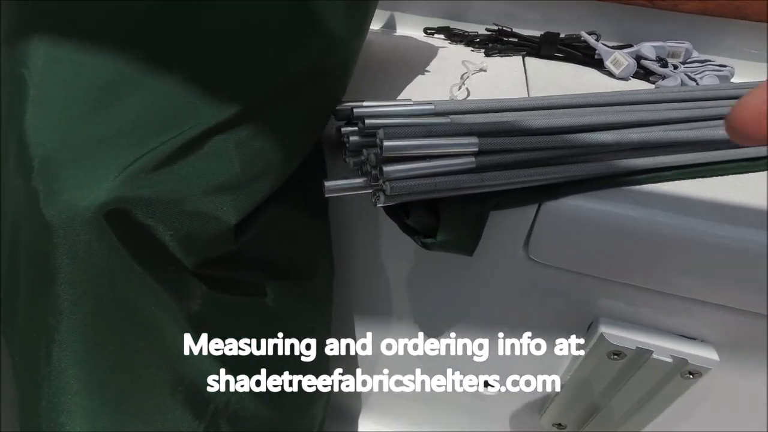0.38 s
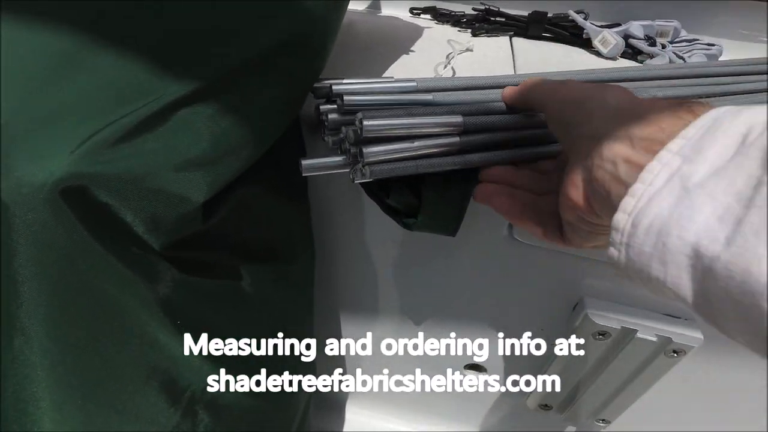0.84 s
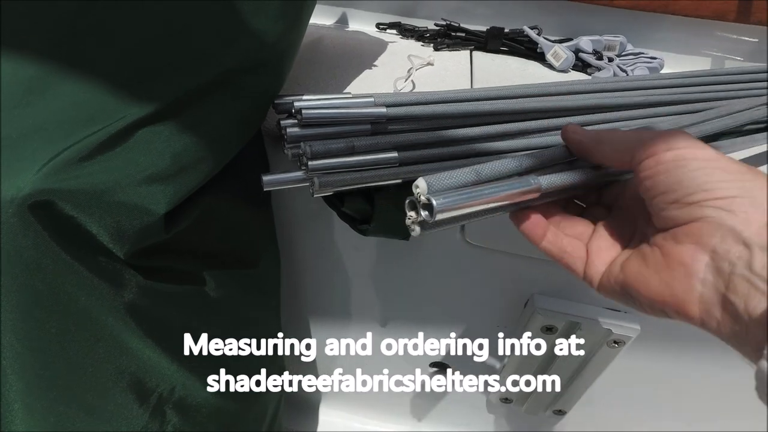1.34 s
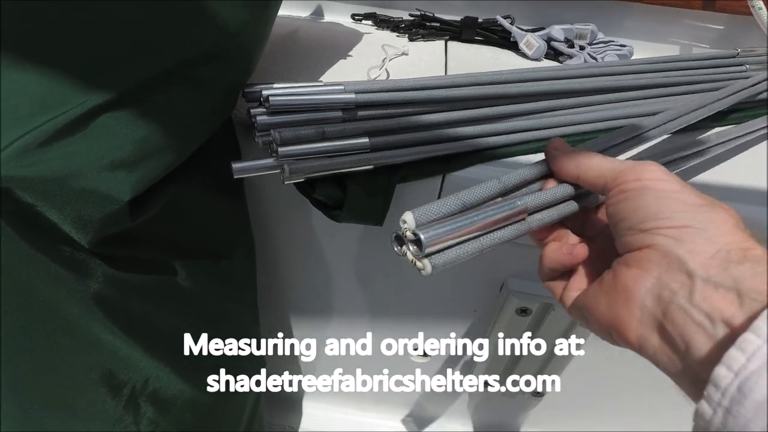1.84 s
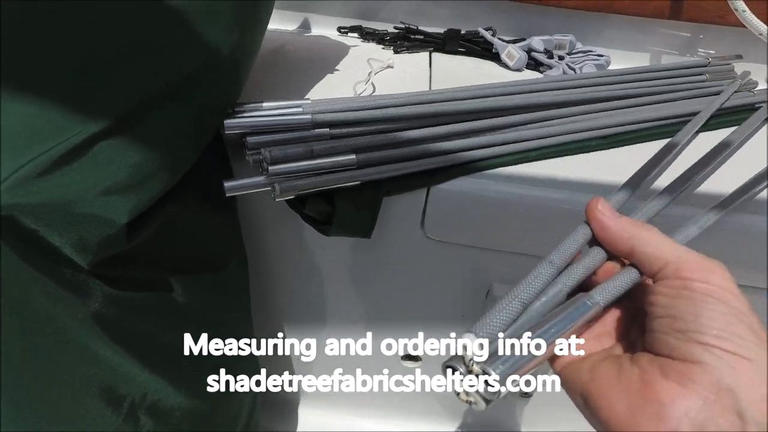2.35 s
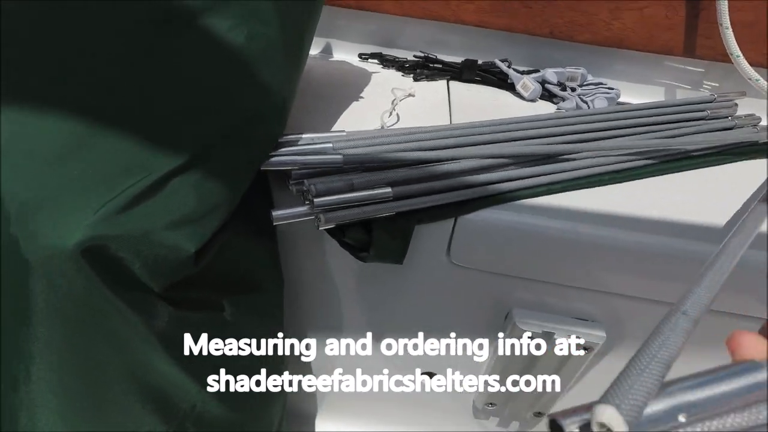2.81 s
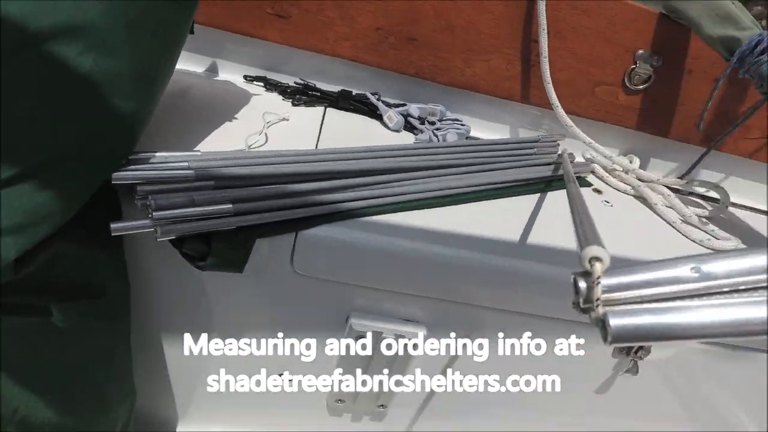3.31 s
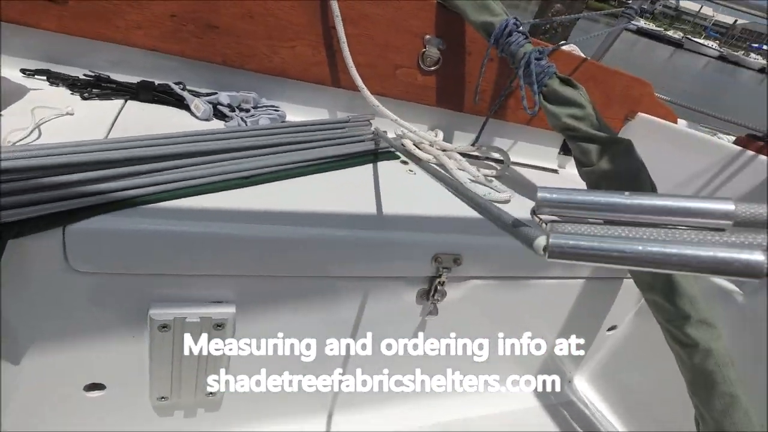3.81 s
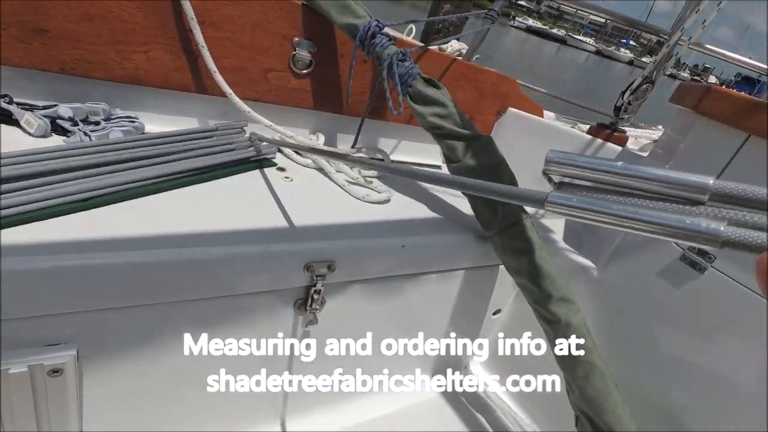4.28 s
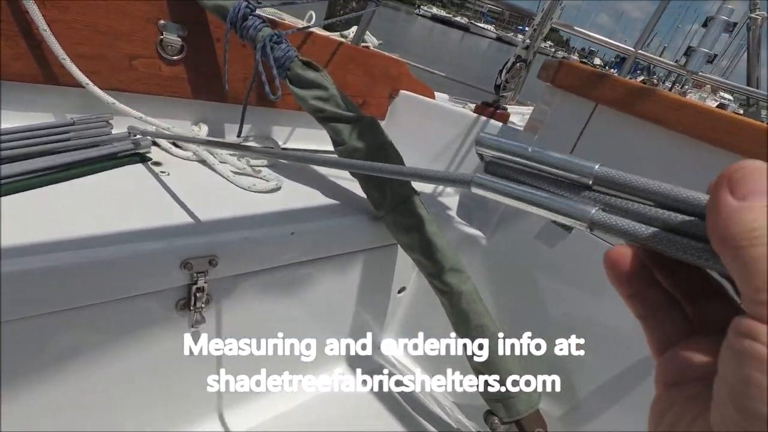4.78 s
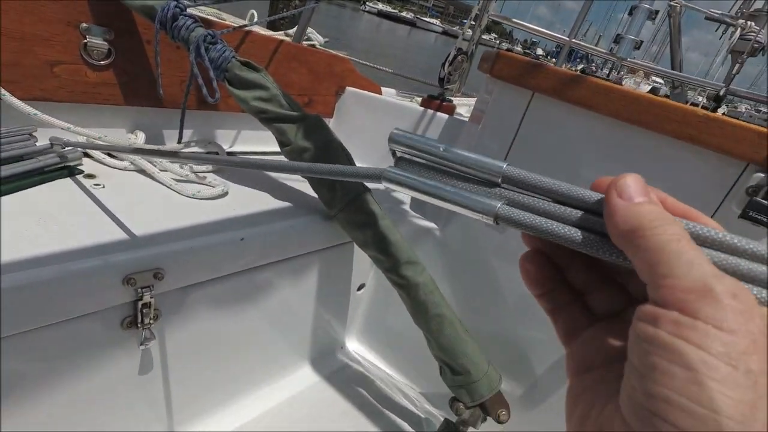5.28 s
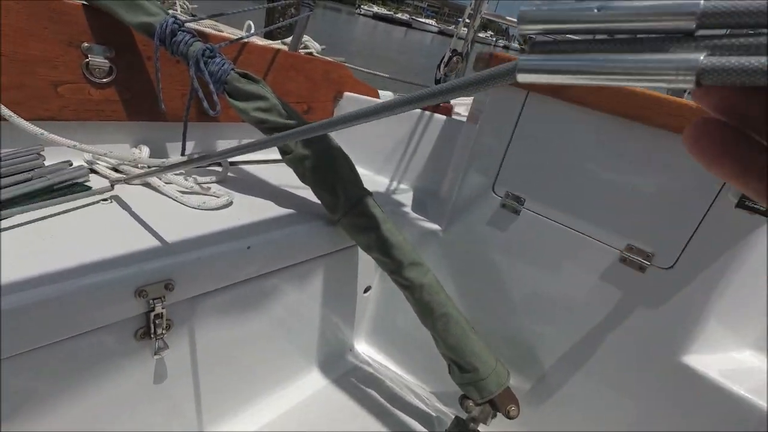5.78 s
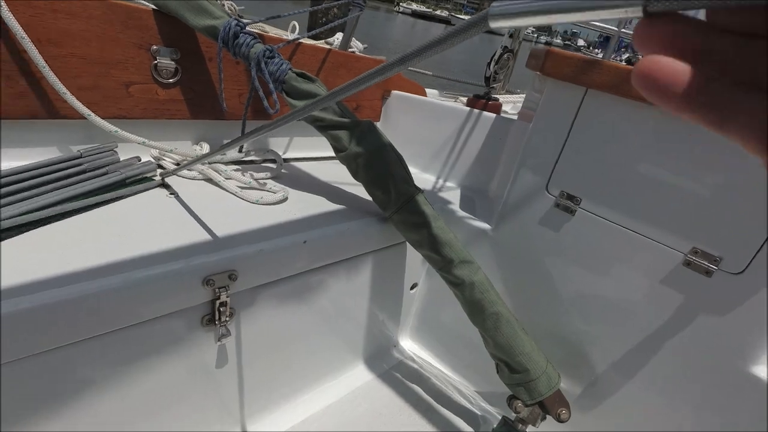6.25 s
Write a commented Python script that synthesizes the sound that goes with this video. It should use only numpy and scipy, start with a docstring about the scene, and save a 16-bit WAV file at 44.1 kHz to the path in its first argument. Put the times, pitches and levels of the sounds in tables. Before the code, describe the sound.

Outdoors in a boat cockpit, close to a stereo camera, uneven water wash, low rumble, soft hiss and a barely audible very high whine run throughout. At 0.03-0.14 s fingers tap the camera shell, the first tap strongest, with tiny clicks. A soft brush passes around 0.3. At 0.9 a very loud, bright rod click bursts into short clatter; another sharp crack with a deck thud comes at 1.55. Small ticks, knocks and scrapes continue, with a crisp click at 2.6 and rubbing after it. At 3.08 a hard clack lands with a strong hollow knock, then clicks at 3.39 and 3.76. It grows sparse, with faint slides and one sharp click at 4.92. At 5.84 a rod end slaps the hollow locker lid, bouncing four times, ever weaker, until 5.96. Light knocks and small rattles finish at 6.1-6.33 as a faint hollow hum rises. Reflections are short and dry.

```python
"""Fibreglass rods with metal sleeves, lifted by hand from a bundle on a boat deck, close to a camera
with two microphone ports; handling of the camera clicks first. Clicks are dying flurries of impacts into
one set of modes; blows on the hollow deck, locker lid and camera shell are decaying modes; sliding,
rubbing and brushing are shaped noise. Around it: harbour wash, rumble, a hollow hum, faint hiss (noise)
and a thin camera whine (a sine). Nearby walls answer the hits; the loudest clicks clip."""
import sys
import numpy as np
from scipy import signal
from scipy.fft import rfft, irfft
from scipy.io import wavfile
from scipy.ndimage import uniform_filter1d, map_coordinates

SR = 44100
rng = np.random.default_rng(int(sys.argv[2]) if len(sys.argv) > 2 else 0)


def magnitude_from_level(level_db):
    """Linear magnitude for a level in decibels (20 dB per decade)."""
    exponent = np.asarray(level_db, float) / 20
    return 10 ** exponent


def generate_wav(signal):
    """Clip the signal to [-1, 1] and save it as 16-bit WAV at the path in sys.argv[1]."""
    frames = np.transpose(np.atleast_2d(signal))
    scaled = np.clip(frames, -1, 1) * 32767
    pcm = np.round(scaled).astype(np.int16)
    wavfile.write(sys.argv[1], SR, pcm)


N = 281358

# surroundings: (time [s], wash level [dB], rubbing level [dB], hiss level [dB])
AROUND_DB = [(0.0, -45.5, -47, -52.5), (0.67, -47.5, -54.5, -52.5), (0.96, -43, -43, -51),
             (1.24, -47.5, -55, -54), (1.4, -46, -44, -54), (1.7, -47.5, -54, -55), (2.49, -44, -44, -47.5),
             (2.79, -47, -50, -51), (3.16, -44.5, -47, -48.5), (3.8, -48, -49, -49),
             (3.92, -48, -53, -50.5), (5.1, -48, -52.5, -54), (5.79, -43, -51, -51.5),
             (6.38, -43, -53.5, -51)]
# rumble: (time [s], level [dB])
RUMBLE_DB = [(0.0, -53), (3.29, -56.5), (5.93, -54), (6.38, -60)]
# hum of the hollow cockpit as the camera turns to it: (time [s], level [dB])
HUM_DB = [(0.0, -60.5), (1.72, -58), (3.71, -50.5), (3.87, -52.5), (6.24, -49), (6.38, -46)]
HUM_HZ, HUM_HALF_WIDTH_HZ = 285, 66.6  # half width at -6 dB
# noise spectra: (frequency [Hz], relative density [dB])
WASH_SPECTRUM = [(100, -40), (170, -15), (246, -8), (285, -6), (357, -2.5), (396, -6), (637, -1), (850, -4),
                 (952, -4.5), (1750, -18), (2000, -13), (2600, -39.5), (4400, -120)]
RUMBLE_SPECTRUM = [(12, -26), (20, -10), (81, 4.5), (98, -4.5), (118, 1), (166, -7.5), (220, -11.5),
                   (290, -93), (480, -120)]
HISS_SPECTRUM = [(3240, -32), (5500, -8), (7190, 0), (8910, -1.5), (9660, -3.5), (12100, -5.5),
                 (15000, -2.5), (15200, 1.5), (16000, -16)]
RUB_SPECTRUM = [(760, -2), (1300, -4.5), (1680, -7.5), (2230, -3), (2930, -4.5), (6040, -7), (8000, -10),
                (10400, -37.5), (17600, -120)]
# skin and cloth brushing past: (frequency [Hz], relative density [dB])
BRUSH_SPECTRUM = [(2000, -40), (4000, -8), (7000, 1), (10000, -6), (15000, -3), (16500, -12)]
# left-right likeness of the noises: (frequency [Hz], coherence [0..1])
COHERENCE = [(60, 0.97), (180, 0.98), (550, 0.97), (1650, 0.31), (4970, 0.055), (15000, 0.25)]
WHINE_HZ, WHINE_RMS_DB = 15704, -58.5  # mean level ahead of the filters

# finger taps on the camera shell: (time [s], peak level [dB], left lag of the nail's tick [us])
TAPS = [(0.0275, -6, -160), (0.0778, -23, 165.5), (0.1363, -13, 84)]
# camera shell modes: (frequency [Hz], level [dB])
SHELL_MODES = [(730, -3), (1010, -0.5), (1270, 2.5), (2300, 0.5)]
SHELL_HARDNESS_OCT, SHELL_T60_MS = 0.26, 11.2  # t60 of a 600 Hz mode
NAIL_OVER_TAP_DB, NAIL_HARDNESS_OCT, NAIL_T60_MS, NAIL_BREADTH_OCT = -14, 1.6, 3, 1.37

# clicks: handling of the camera up to 0.142 s, then rod contacts:
# (time [s], level [dB], hardness [octaves re 1 kHz], chatter t60 [ms], left lag [us])
CLICKS = [(0.069, -38.5, 0.92, 79, 160), (0.0894, -30.5, 3.2, 23.5, -16), (0.0957, -25.5, 3, 15, -5),
          (0.0978, -21.5, 4, 5.5, -36), (0.142, -35, 3.2, 17, 67), (0.703, -43, 1.53, 120, 21),
          (0.758, -39.5, 0.6, 48, 21), (0.8226, -36.5, 1.7, 53, -22), (0.8442, -26, 2.08, 29, 23.5),
          (0.863, -30.5, 2, 11, 119), (0.888, -26, 3, 62, 15), (0.8952, 7.5, 3.13, 31, 24),
          (0.8993, -4.5, 2.55, 22, 14), (0.9119, -7.5, 2.7, 40, 28), (0.923, -13, 2.5, 39, 34),
          (0.9475, -29, 1.76, 65, 6), (0.9664, -21, 1.96, 110, 19), (0.973, -26, 2.6, 12, 61),
          (0.9834, -26.5, 1.9, 37, -160), (1.048, -24.5, 2.5, 16, 38.5), (1.095, -43, 1.9, 18, 30),
          (1.1652, -32.5, 1.96, 61, 29), (1.3178, -22.5, 3.06, 19, 28.5), (1.3618, -34.5, 2.1, 45, 54),
          (1.379, -28, 2.1, 170, 58), (1.392, -17, 2.33, 48, 7.5), (1.425, -29.5, 2.1, 20, 57),
          (1.4938, -18.5, 2.64, 23, 19), (1.5, -17, 2.02, 19, 37), (1.5419, -17, 3.2, 120, 25.5),
          (1.5486, 6.5, 3.13, 15.3, 13), (1.553, -12.5, 2.2, 83, 29), (1.58, -24, 2.24, 41, 45),
          (1.7335, -41, 1.9, 77, 79), (1.767, -46.5, 1.7, 27, 14), (1.866, -35, 2.02, 46, 12),
          (1.917, -30.5, 0.87, 30, 67), (1.9707, -40, 2.13, 130, -27), (2.059, -36, 2.03, 96, -50),
          (2.0843, -30.5, 1.97, 59, -75), (2.098, -24, 2.56, 30, 41), (2.296, -42, 1, 38, 67),
          (2.4012, -39, 1.74, 41, 21), (2.4438, -29.5, 0.92, 54, 53), (2.453, -31, 1.14, 9.9, 22),
          (2.488, -23.5, 2.55, 37, 67), (2.598, -10.5, 3.36, 45, 34), (2.933, -39, 2.8, 9.1, 57),
          (3.006, -41, 1.5, 130, 88), (3.0334, -15.5, 2.15, 30, 20), (3.074, 0.5, 3, 32, -110),
          (3.0783, -18, 3.6, 33, -110), (3.0896, -8, 2.38, 58, -84.5), (3.13, -35.5, 1.8, 190, 140),
          (3.158, -23.5, 1.9, 36, 123.5), (3.3907, -6, 2.94, 40, 93), (3.495, -38.5, 1.32, 8.2, 54),
          (3.5635, -41, 1.7, 36, 90), (3.6442, -40.5, 1.5, 45, 90), (3.7356, -34.5, 1.4, 27, 103),
          (3.7583, -10.5, 2.6, 163, -53), (3.76, -20, 1.25, 100, -49), (3.768, -11, 2.9, 71, -22),
          (3.787, -27.5, 0.76, 43, 17), (3.818, -32.5, 1.9, 190, 55), (3.8452, -39, 0.7, 69, 108),
          (3.8945, -31.5, 3.7, 16.7, -21), (3.9022, -33, 1.8, 55, 100), (4.318, -41, 1, 33, -17),
          (4.3734, -25, 2.15, 26, 108), (4.862, -32, 1.7, 7.4, 100), (4.9171, -4, 2.47, 20, 207),
          (6.2212, -36, 1.5, 81, 109), (6.268, -27.5, 2.09, 48, 112.5)]
# modes of rods and sleeves, lent to every click: (frequency [Hz], width [Hz], level [dB])
CLICK_MODES = [(1070, 320, -19), (1260, 80, 9.5), (1820, 72, -3), (2283, 133, 6.5), (2830, 1500, -27.5),
               (3200, 220, -15.5), (3620, 63, -36.5), (4170, 220, -28.5), (4740, 350, -14.5),
               (5150, 230, 3), (6110, 390, -1.5), (6070, 153, 0.5), (6740, 110, -12.5), (7714, 100, 2),
               (8700, 807, -6), (9016, 1300, -10.5), (9070, 83, -20.5), (9680, 485, 3.5), (10700, 760, -22),
               (11430, 270, 2.5), (13220, 180, 7), (13780, 1200, -1.5), (14400, 380, -29)]
# direction of the clicks, camera handling first, then rods: (time [s], left over right [dB])
BEARING = [(0, -14), (.034, 3.5), (.1, 8.5), (.13, -13), (.9, -2.5), (1.3, -2.5), (2.5, -4.5), (3.07, -3),
           (3.8, -2), (4.9, -5), (5.9, -4), (6.38, -4.5)]
# harder contacts reach more modes: breadth at hardness 0, growth per octave of hardness
BREADTH_OCT, BREADTH_PER_OCT = 0.32, 0.21
# scrape after a click: level for a 0 dB click, growth per dB of click up to 0 dB, t60, share in the hiss
SETTLE_DB, SETTLE_DB_PER_DB, SETTLE_T60_S, SETTLE_HISS_DB = -44, 0.34, 0.32, -2
# cockpit walls: (frequency [Hz], t60 [s])
WALL_T60 = [(500, 0.15), (3000, 0.069), (12000, 0.039)]

# a hand or rod slides: (middle [s], length [s], scrape level [dB], brushing level [dB])
SLIDES = [(0.333, 0.17, -48, -48.5), (0.782, .12, -50, -63), (2.294, 0.1, -44, -56),
          (2.53, 0.087, -58, -47), (2.652, 0.16, -43, -47), (2.986, 0.11, -51.5, -49),
          (3.206, .15, -51.5, -50), (3.6, 0.18, -55, -53), (3.926, 0.15, -49, -46.5),
          (4.148, 0.12, -58, -53.5), (4.6, 0.25, -55, -56.5), (5.514, 0.28, -53, -57)]

# knocks on the deck: (time [s], peak level [dB], hardness [octaves re 1 kHz])
KNOCKS = [(0.839, -32.5, -0.4), (0.8928, -22.5, -0.4), (0.9192, -27.5, 0.29), (0.9671, -27.5, -0.048),
          (1.1181, -32.5, -0.85), (1.3972, -30, -0.56), (1.5522, -16.5, -0.78), (1.9158, -27, -0.41),
          (1.9395, -29, -1.55), (2.073, -27.5, -0.0005), (2.0854, -26.5, -0.75), (2.4411, -28.5, -0.46),
          (2.4551, -25.5, -0.54), (3.0377, -29.5, -0.14), (3.084, -11.5, -0.75), (3.0925, -6.5, -0.52),
          (3.122, -24, -0.12), (3.1627, -23.5, -0.37), (3.3914, -33.5, -0.059), (3.7637, -23, -0.17),
          (3.7766, -22.5, -0.46), (3.8424, -22.5, -0.0069), (4.3744, -29, -0.58), (4.9163, -29.5, 0.48),
          (6.1089, -30.5, -0.35), (6.163, -29, -0.48), (6.1727, -31, -0.17), (6.2216, -23.5, -0.12),
          (6.2472, -24.5, 0.072), (6.2666, -27, -1.2), (6.3286, -32, -0.29)]
# deck panel modes: (frequency [Hz], level [dB])
DECK_MODES = [(296, -1.5), (345, -9.5), (501, -1), (572, 3), (660, -9), (790, -8.5), (980, -4.5),
              (1070, -5.5), (1300, -8), (1500, -10)]
DECK_T60_MS = 70  # of a 600 Hz mode

# rod end bouncing on a locker lid:
# (time [s], knock peak level [dB], hardness [octaves re 1 kHz], slap level [dB])
BOUNCES = [(5.8409, -7.5, -0.49, -11), (5.884, -11.5, -0.65, -29), (5.9209, -20, -0.88, -42),
           (5.9571, -26.5, -0.71, -37)]
# locker lid modes: (frequency [Hz], level [dB])
LID_MODES = [(296, 3.5), (598, 3.5), (904, -5), (1206, -6), (1766, 18.5), (2008, 19), (2390, 21)]
LID_T60_MS = 73  # of a 600 Hz mode
SLAP_HARDNESS_OCT, SLAP_T60_MS, SLAP_LEFT_LAG_US, SLAP_BREADTH_OCT = 1.6, 71, -32.5, 1.84


def unit(x):
    """Scales to rms 1."""
    return x / np.sqrt(np.mean(x ** 2) + 1e-20)


def along(points, hz):
    """Interpolates (frequency [Hz], value) points on a log frequency axis."""
    f, v = np.transpose(points)
    return np.interp(np.log(hz + 1), np.log(f + 1), v)


def curves(rows):
    """One value per sample for each column after the time."""
    s, *cols = np.transpose(rows)
    return [np.interp(np.arange(N) / SR, s, c) for c in cols]


def wobble(rate_hz):
    """Smooth random curve through rate_hz random knots a second."""
    knots = rng.standard_normal(int(N * rate_hz / SR) + 4)
    return map_coordinates(knots, [np.arange(N) * rate_hz / SR])


def bell(hz, centre_oct, spread_oct):
    """Gain of a blow around its centre [octaves re 1 kHz]; harder blows sit higher."""
    return np.exp(-.5 * ((np.log2(hz / 1000 + 1e-9) - centre_oct) / spread_oct) ** 2)


def rush(spectrum, patchy_db):
    """Stereo noise of rms 1: random gain patches in time and frequency, then spectrum and coherence."""
    hz, _, z = signal.stft(rng.standard_normal((2, N + 512)), SR, nperseg=512)
    field = uniform_filter1d(rng.standard_normal(z.shape[1:]), size=5, axis=0)
    field = uniform_filter1d(field, size=8, axis=1)
    pair = signal.istft(z * magnitude_from_level(patchy_db * unit(field)), nperseg=512)[1]
    hz = np.fft.rfftfreq(pair.shape[1], 1 / SR)
    turn = np.arccos(np.clip(along(COHERENCE, hz), 0, 1)) / 2
    shaped = rfft(pair) * magnitude_from_level(along(spectrum, hz))
    mid, side = irfft(shaped * [np.cos(turn), np.sin(turn)])[:, :N]
    return unit(np.array([mid + side, mid - side]))


def harbour(wash_db, hiss_db):
    """Water wash lapping unevenly, far rumble, hum of the hollow cockpit and a smoother hiss."""
    rumble_db, = curves(RUMBLE_DB)
    hum_db, = curves(HUM_DB)
    lapping = magnitude_from_level(2.43 * wobble(7.1) + 0.89 * wobble(60))
    wash = magnitude_from_level(wash_db) * unit(lapping * rush(WASH_SPECTRUM, patchy_db=2.0))
    rumble = magnitude_from_level(rumble_db) * rush(RUMBLE_SPECTRUM, patchy_db=-1.0)
    resonance = [(HUM_HZ + k * HUM_HALF_WIDTH_HZ, db)
                 for k, db in [(-3, -40), (-1, -6), (0, 0), (1, -6), (3, -40)]]
    hum = magnitude_from_level(hum_db) * rush(resonance + [(900, -120)], patchy_db=-1.5)
    hiss = magnitude_from_level(hiss_db) * rush(HISS_SPECTRUM, patchy_db=-1.3)
    return wash + rumble + hum + hiss


def rubbing(db):
    """Sliding rods: scrape noise with tiny ticks riding on it."""
    ticks = magnitude_from_level(1.2 * np.maximum(wobble(400), 0) + 1.2 * wobble(25))
    return magnitude_from_level(db) * unit(ticks * rush(RUB_SPECTRUM, patchy_db=1.5))


def camera_whine():
    """Thin steady-pitched sine of the camera, its level wavering slightly."""
    level = np.sqrt(2) * magnitude_from_level(WHINE_RMS_DB + .8 * wobble(8))
    return level * np.sin(2 * np.pi * WHINE_HZ * np.arange(N) / SR)


def contact_clicks(rows, size=8192, lead=64):
    """Each contact: a dying flurry of tiny impacts into the modes, heard a little differently by each port.

    rows: (time [s], level [dB], hardness [octaves], chatter t60 [ms], left lag [us], breadth [octaves])
    """
    out = np.zeros((2, N + size))
    f = np.fft.rfftfreq(size, 1 / SR)
    after_s = np.maximum((np.arange(size) - lead) / SR, 0)
    ports = np.array([[1], [-1]])
    centre, width, mode_db = np.transpose(CLICK_MODES)[:, :, None]
    signs = (-1.) ** np.arange(len(CLICK_MODES))[:, None]
    drive = 1j * f * width
    modes = signs * magnitude_from_level(mode_db) * drive / (centre ** 2 - f ** 2 + drive)
    treble = f ** 2 / (f ** 2 + 6500 ** 2)
    for s, db, hardness, t60_ms, lag_us, breadth in rows:
        pan_db = np.interp(s, *np.transpose(BEARING))
        fade = magnitude_from_level(-60 * after_s / (t60_ms / 1000)) * (1 - np.exp(-after_s / 0.00065))
        # uneven impacts: one series common to both ports, one for each
        impacts = rng.standard_normal((3, size)) * magnitude_from_level(5 * rng.standard_normal((3, size)))
        impacts[0, lead + 12] += 9 * rng.choice([-1, 1])  # the first blow is the sharpest
        impacts = impacts[0] + .55 * impacts[1:]
        clumps_db = 1.5 * np.repeat(rng.standard_normal(size // 64), 64)
        impacts *= magnitude_from_level(clumps_db)
        # later impacts are softer: the treble dies first
        flurry = rfft(impacts * fade) * (1 - treble) + rfft(impacts * fade ** 1.91) * treble
        chance = magnitude_from_level(rng.normal(0, 1.5, len(CLICK_MODES)))
        struck = chance * bell(centre[:, 0], hardness, breadth)
        # uneven radiation towards the two ports
        facing = magnitude_from_level(rng.normal(0, 1.5, (2, len(CLICK_MODES))))
        body = (facing * struck) @ modes
        body += 0.66 * bell(f, hardness, 1.18 * breadth)
        body += 0.074 * bell(f, 0.086, 0.41)  # the whole body shudders with a dull tick
        lag = np.exp(-1j * np.pi * f * lag_us / 10 ** 6 * ports)
        hit = irfft(flurry * body * lag)[:, :size // 2]
        # level: loudest 3 ms rms, ahead of the panning
        loudest = np.sqrt(uniform_filter1d(hit ** 2, size=132).max(axis=1, keepdims=True))
        start = round(s * SR) - lead
        out[:, start:start + size // 2] += magnitude_from_level(db + pan_db / 2 * ports) * hit / loudest
    return out[:, :N]


def hollow_ring(blows, modes, t60_ms, rise_s):
    """A struck hollow body: decaying modes, the higher ones dying sooner.

    blows: (time [s], peak level [dB], hardness [octaves]); t60_ms and rise_s hold for a 600 Hz mode.
    """
    out, t = np.zeros(N + SR), np.arange(SR // 5) / SR
    hz, mode_db = np.transpose(modes)[:, :, None]
    t60_s = t60_ms / 1000 * (600 / hz) ** 0.9
    build = 1 - np.exp(-t / (rise_s * (600 / hz) ** 1.1))  # low modes take longer
    for s, db, hardness in blows:
        scatter_db, detune = rng.normal(0, 2, hz.shape), rng.normal(1, .01, hz.shape)
        level = magnitude_from_level(mode_db + scatter_db - 60 * t / t60_s) * bell(hz, hardness, 0.68)
        # the panel rattles, so each mode wanders in phase
        wander = 0.043 * np.cumsum(rng.standard_normal(level.shape), axis=1)
        tones = np.sin(2 * np.pi * hz * detune * t + wander)
        ring = (level * tones * build).sum(axis=0)
        out[round(s * SR):][:len(t)] += magnitude_from_level(db) * ring / abs(ring).max()
    return out[:N] * magnitude_from_level([[.4], [-.4]])  # slightly left


def finger_taps():
    """Fingers on the camera: ticks of the nail, and the ringing shell."""
    nails = [(s, db + NAIL_OVER_TAP_DB, NAIL_HARDNESS_OCT, NAIL_T60_MS, lag_us, NAIL_BREADTH_OCT)
             for s, db, lag_us in TAPS]
    blows = [(s, db, SHELL_HARDNESS_OCT) for s, db, _ in TAPS]
    return contact_clicks(nails), hollow_ring(blows, SHELL_MODES, SHELL_T60_MS, rise_s=0.0024)


def handling_and_rod_clicks():
    """Camera handling, then rod contacts: harder ones excite a broader span of modes."""
    return contact_clicks([(*row, BREADTH_OCT + BREADTH_PER_OCT * row[2]) for row in CLICKS])


def settling():
    """Power of the scrape trailing each click, as what was struck goes on shifting."""
    kicks = np.zeros(N)
    for s, db, *_ in CLICKS:
        kicks[round(s * SR)] += magnitude_from_level(2 * (SETTLE_DB + SETTLE_DB_PER_DB * min(db, 0)))
    decay = magnitude_from_level(-120 * np.arange(SR) / SR / SETTLE_T60_S)  # -60 dB of power at t60
    return abs(signal.fftconvolve(kicks, decay)[:N])


def cockpit(x, step=8192):
    """Nearby walls: decaying noise tails; the sources move, so every stretch gets a fresh one."""
    out = np.zeros((2, N + SR))
    for a in range(0, N, step):
        hz, t, z = signal.stft(rng.standard_normal((2, SR // 5)), SR, nperseg=128)
        decay = magnitude_from_level(-60 * t / along(WALL_T60, hz)[:, None])
        tail = signal.istft(z * decay, SR, nperseg=128)[1]
        wet = signal.fftconvolve(x[:, a:a + step], tail / np.linalg.norm(tail[0]), axes=1)
        out[:, a + 130:a + 130 + wet.shape[1]] += wet  # 3 ms later
    return out[:, :N]


def sliding():
    """Powers of scrape and brushing, swelling and fading with each slide."""
    s, length_s, *db = np.transpose(SLIDES)[:, :, None]
    swell = np.exp(-8 * ((np.arange(N) / SR - s) / length_s) ** 2)
    return (magnitude_from_level(2 * np.array(db)) * swell).sum(axis=1)


def brushing(power):
    """Skin and cloth brushing past: patchy treble noise."""
    return np.sqrt(power) * rush(BRUSH_SPECTRUM, patchy_db=3.5)


def deck_knocks():
    """Knocks ringing the hollow deck panel."""
    return hollow_ring(KNOCKS, DECK_MODES, DECK_T60_MS, rise_s=0.004)


def lid_bounces():
    """A rod end bouncing on the locker lid: slaps of the rod, and the ringing lid."""
    slaps = [(s, db, SLAP_HARDNESS_OCT, SLAP_T60_MS, SLAP_LEFT_LAG_US, SLAP_BREADTH_OCT)
             for s, _, _, db in BOUNCES]
    blows = [row[:3] for row in BOUNCES]
    return contact_clicks(slaps), hollow_ring(blows, LID_MODES, LID_T60_MS, rise_s=0.0027)


def scene():
    """Clicks, deck, locker, camera shell, walls and surroundings."""
    wash_db, rub_db, hiss_db = curves(AROUND_DB)
    nails, shell = finger_taps()
    slaps, lid = lid_bounces()
    clicks = nails + handling_and_rod_clicks() + slaps
    hollow = shell + deck_knocks() + lid
    walls = cockpit(magnitude_from_level(-12.5) * clicks + magnitude_from_level(-22.5) * hollow)
    trail = settling()
    scrape, brush = sliding()
    rub_db = 10 * np.log10(magnitude_from_level(2 * rub_db) + trail + scrape)
    hiss_db = 10 * np.log10(magnitude_from_level(2 * hiss_db) + magnitude_from_level(2 * SETTLE_HISS_DB) * trail)
    return clicks + hollow + walls + rubbing(rub_db) + brushing(brush) + harbour(wash_db, hiss_db)


def band_limit(x):
    """A steep low-pass at the top of the band."""
    return signal.sosfilt(signal.butter(12, 16320, fs=SR, output="sos"), x)


def record(dry):
    """The camera adds its whine, clips the loudest clicks, falls off steeply above 16.3 kHz, thins deep bass."""
    x = np.clip(dry + camera_whine(), -.93, .93)
    x = signal.sosfilt(signal.butter(14, 16300, fs=SR, output="sos"), x)
    x = signal.sosfilt(signal.butter(1, 80, "high", fs=SR, output="sos"), x)
    return band_limit(x)


dry = scene()
out = record(dry)
generate_wav(out)
```